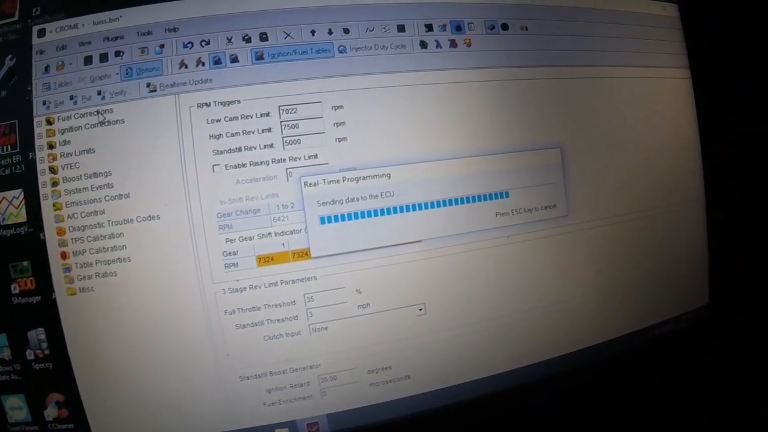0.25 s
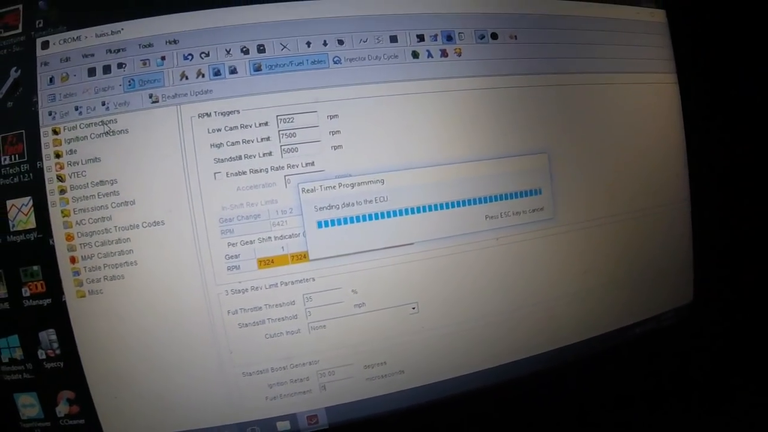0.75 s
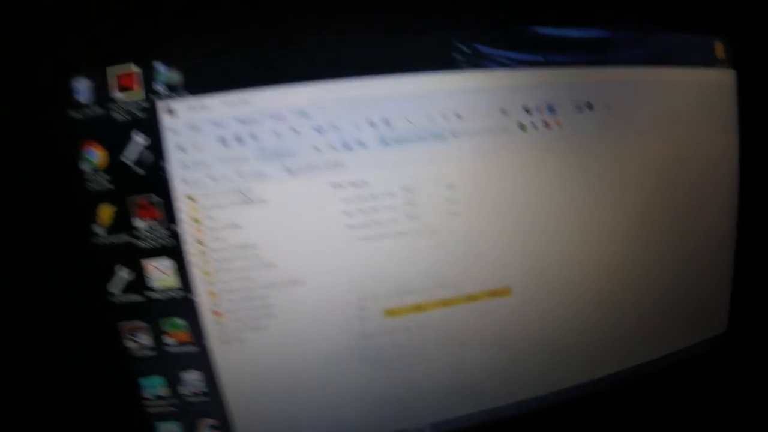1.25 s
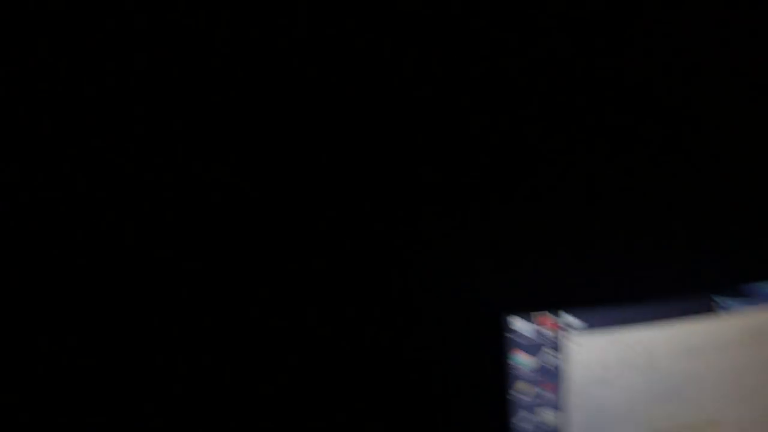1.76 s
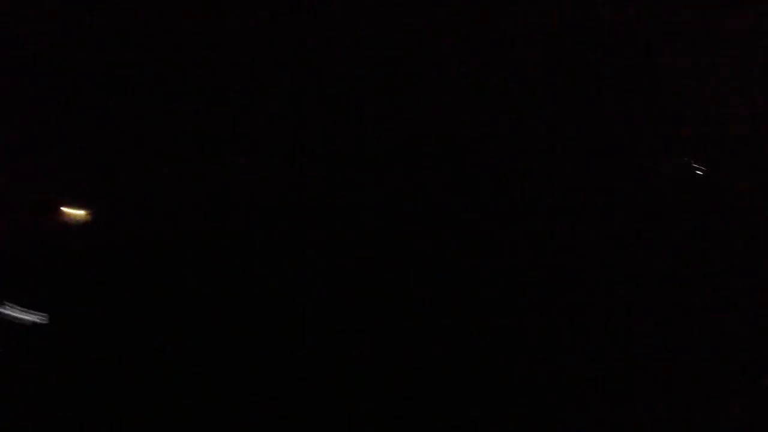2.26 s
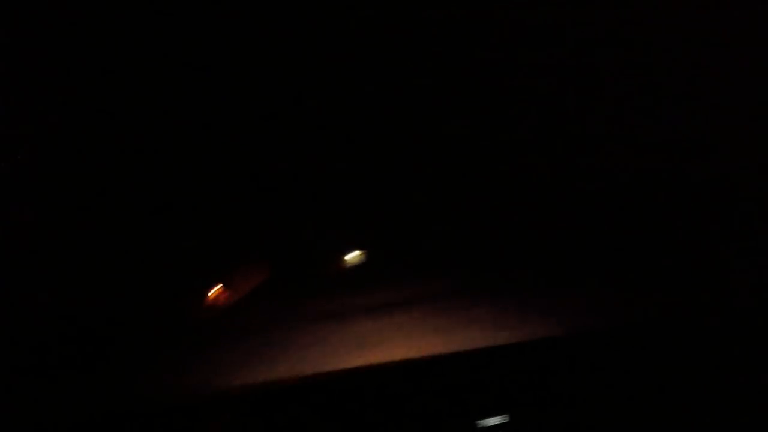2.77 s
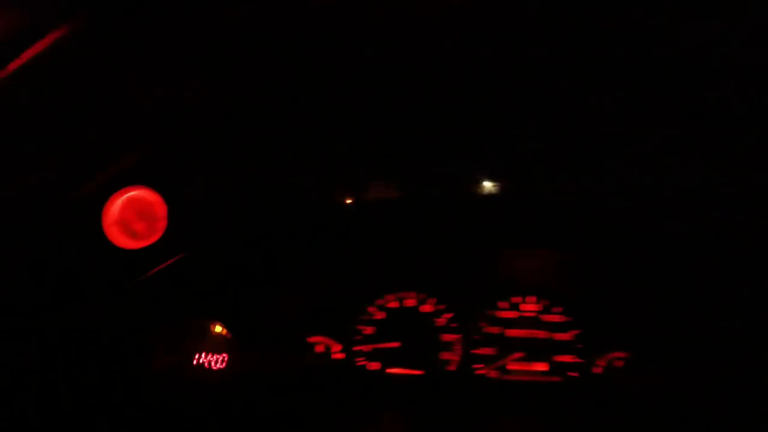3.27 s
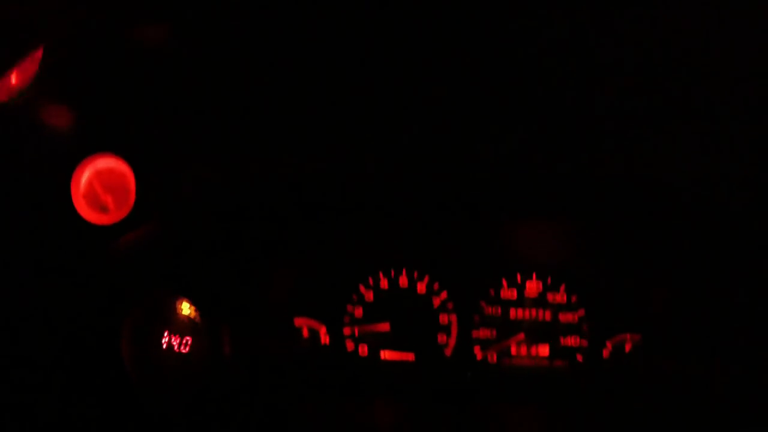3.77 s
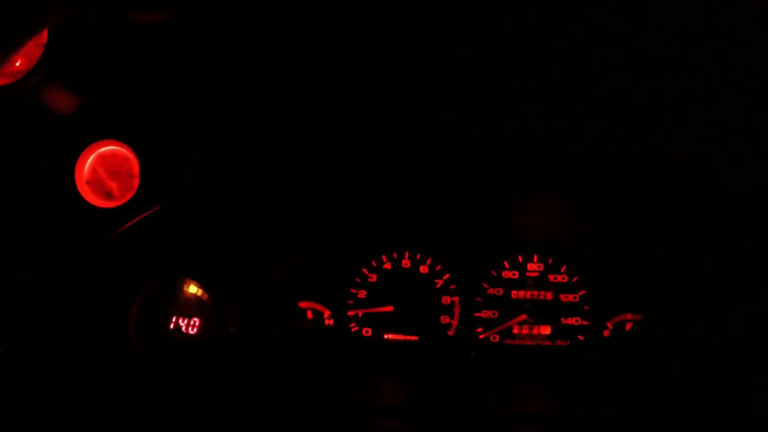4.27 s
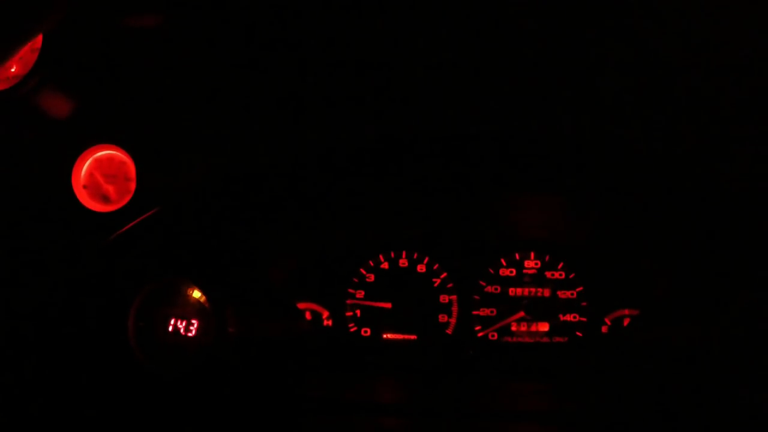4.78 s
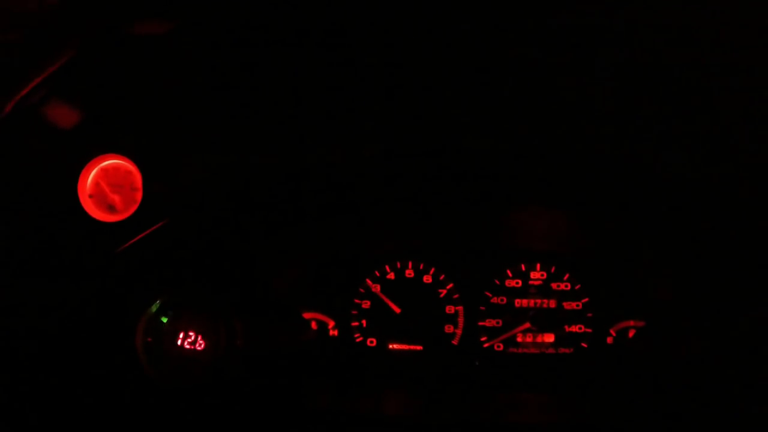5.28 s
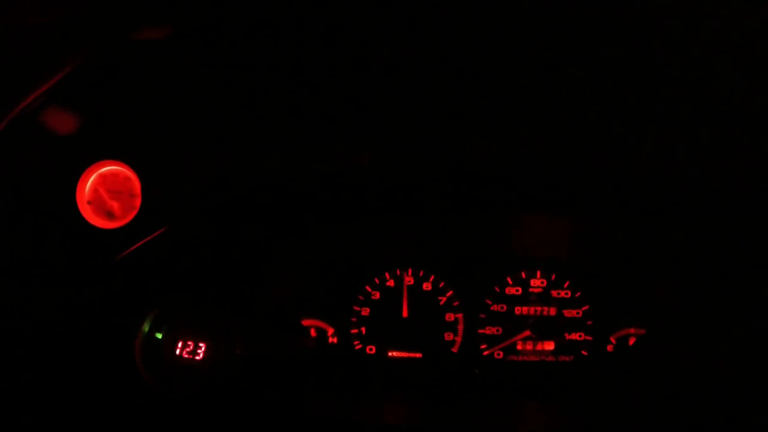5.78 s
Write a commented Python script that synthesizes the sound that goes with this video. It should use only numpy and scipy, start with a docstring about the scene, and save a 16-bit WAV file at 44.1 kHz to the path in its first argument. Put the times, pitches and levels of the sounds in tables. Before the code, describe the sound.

A low, pulsing engine idle fills the cabin of a stationary turbocharged car, its boom shifting as the microphone travels from a laptop to the dashboard. The plastic laptop knocks and scrapes briefly on the way. After a few seconds the throttle opens: the engine falters, fires hard and climbs in pitch with a faint rush of intake air, ending in choppy limiter cuts and dull exhaust pops.

```python
"""A low, throbbing idle fills a parked car: the exhaust pulses of a turbocharged four-cylinder boom in the
cabin over faint clatter and hiss. The microphone moves from a laptop toward the dashboard, and the laptop
is set down with a scrape. The throttle opens, the engine stumbles and catches, and its harmonics sweep
through the cabin's booms while the intake rushes and the alternator whines. At the top the rev limiter
cuts the firings, so the drone stutters and unburnt charge pops in the exhaust."""
import sys
import numpy as np
from scipy import signal
from scipy.fft import rfft, irfft
from scipy.io import wavfile
from scipy.ndimage import uniform_filter1d, minimum_filter1d, map_coordinates

SR = 44100
rng = np.random.default_rng(int(sys.argv[2]) if len(sys.argv) > 2 else 0)


def store_wav(level_fs):
    """Save 16-bit WAV to argv[1]."""
    pcm = np.round(np.clip(np.atleast_2d(level_fs), -1, 1) * 32767)
    wavfile.write(sys.argv[1], SR, pcm.T.astype(np.int16))


N = 266115
TIME = np.arange(N) / SR

# The microphone's path. Each row: time in seconds, place (0 laptop, 1 between the seats, 2 dashboard).
MIC_PATH = [(0, 0.048), (1, 0.13), (1.76, 0.25), (2.13, 1.09), (2.8, 1.66), (4.44, 1.755)]
# Handling rustles and laptop scrapes. Each row: middle in seconds, length in seconds, level in dB.
RUSTLES = [(2.66, 0.085, -56), (2.78, 0.033, -53.5)]
SCRAPES = [(2.163, 0.034, -33.5), (2.201, 0.027, -26), (2.219, 0.011, -34), (4.038, 0.018, -40)]
# One-shots. Each row: start in seconds, level in dB.
CABIN_CLICKS = [(2.122, -30), (4.458, -14), (5.61, -23.5)]
LAPTOP_KNOCKS = [(2.156, -19), (2.204, -15), (2.367, -23), (4.031, -26), (5.443, -22.5)]   # it lands, is nudged and is shaken
HARD_FIRINGS = [(4.5125, -9.5), (4.541, -5), (4.567, -6), (4.591, -8), (4.619, -11)]   # the engine fights out of its stumble
# Ringing parts. Each row: pitch in Hz, bandwidth in Hz, relative level in dB.
LAPTOP_MODES = [(284, 13, 6), (483, 29, 5), (673, 44, -1.5), (1000, 34, -2), (1315, 52, -8),
                (1767, 90, -15.5), (2040, 83, -16), (3290, 330, -22), (4620, 360, -27.5), (6780, 320, -31)]
PANEL_MODES = [(382.7, 13, -4), (492, 11, -2.5), (529, 12, 2), (628, 12, -5), (697, 9.2, -2)]

# Tone colours, drawn as EQ curves. Each row: frequency in Hz, relative level in dB.
RUSTLE_COLOUR = [(2000, -7), (3300, 2.5), (5000, -2), (7200, -3.5), (8200, -22)]
CLICK_COLOUR = [(200, 21.5), (1000, 6), (4000, -6), (12000, -23.5), (14000, -36)]
INTAKE_COLOUR = [(1200, 1.5), (2200, 1), (3900, -11), (5100, -5), (6000, -13.5)]
HISS_COLOUR = [(1500, -10), (2500, -1.5), (3200, -1.5), (5300, -5), (6500, -10.5), (8500, -14),
               (10500, -23.5), (14000, -25.5)]
CLATTER_AT_LAPTOP = [(200, -5), (320, 4), (630, 5.5), (760, -5.5), (1100, -8), (1900, -10), (2800, -17.5),
                     (4000, -32.5)]
CLATTER_AT_DASH = [(200, -6), (300, 8), (430, 0.5), (530, -2.5), (850, 0), (1080, -1.5), (1240, 0.5),
                   (1400, -7), (1700, -11), (2200, -10), (2800, -22), (4000, -35)]
IDLE_AT_LAPTOP = [(20, -49.5), (35, 4.5), (70, 0), (104, -4.5), (139, -7.5), (174, 2), (208, -15),
                  (243, -14), (280, -34.5), (315, -24), (380, -42), (630, -47), (900, -56.5)]
IDLE_AT_SEATS = [(20, -35.5), (35, 3.5), (70, -2), (104, -3.5), (139, -19.5), (174, -18), (208, -19.5),
                 (243, -16.5), (280, -35), (420, -44.5), (900, -45)]
IDLE_AT_DASH = [(20, -41), (35, 2), (70, -2), (104, 3.5), (139, -2), (174, 1.47), (208, -6.5), (243, -15),
                (280, -43), (385, -42), (530, -48), (900, -62)]
POP_COLOUR = [(90, 1), (340, 2.5), (450, -5), (590, 0), (800, -9.5), (3000, -42.5)]
RASP_COLOUR = [(60, -20), (260, -1), (355, 12), (440, -5), (520, 2), (640, -7.5), (850, -16), (1250, -25),
               (2500, -45)]   # the upper exhaust harmonics
CABIN_BOOMS = [(42, -11.5), (55, -10), (76, -17), (93, -17), (104, -11), (125, -12), (143, -15), (168, -9),
               (192, -21), (212, -17.5), (296, -39.5), (335, -23), (380, -27.5), (420, -45), (470, -44.5),
               (505, -27.5), (560, -42), (640, -36.5), (690, -47)]   # the resonances that the rev sweeps through
# The standing wave that lingers at laptop, seats and dashboard. Each entry: pitch in Hz.
STANDING_HZ = [54.3, 131, 79.6]
# The engine bay at idle. Each row: microphone place, clatter in dB, hiss in dB, both before their trims.
BAY_AT_PLACE = [(0, -50.3, -59), (.09, -48.5, -58.5), (.22, -46, -56.5), (1, -47, -57.5), (2, -45.5, -60)]

# The cylinders in firing order. Each row: strength in dB, lateness in firing periods.
CYLINDERS = [(0.04, 0.012), (1.73, -0.015), (-0.2, 0.0095), (1.4, -0.006)]
# The idle hunts, then the engine revs. Each row: time in seconds, firings per second.
IDLE_SPEED = [(0.0, 34.5), (1.01, 34.9), (2.09, 34.3), (2.6, 35.2), (4.44, 34.65)]
REV_SPEED = [(4.55, 39.1), (4.62, 43.8), (4.682, 51.5), (4.742, 56.9), (4.794, 61.5), (4.946, 71.9),
             (5.094, 95.6), (5.244, 103.8), (5.348, 101.3), (5.394, 111.4), (5.598, 160.4), (5.75, 165.1),
             (5.87, 167.3), (6.03, 164.8)]
# Engine load, with a brief lift of the pedal. Each row: time in seconds, gain on the drone in dB.
LOAD = [(4.7, -4.5), (4.85, -5), (5.02, 1), (5.18, -3), (5.32, -5.5), (5.43, 4), (5.54, 0), (5.7, 1.5),
        (5.86, -2.5), (5.97, -6)]
# The firing tone and its next four harmonics. Each entry: relative level in dB.
HARMONIC_DB = [-0.5, -3.5, -6.5, -13.5, -15.5]
# The rev limiter. Each row: start of the cut in seconds, return of the firings in seconds.
LIMITER_CUTS = [(5.749, 5.8), (5.869, 5.962)]
# Unburnt charge going off in the exhaust. Each row: start in seconds, thump in dB, crack in dB.
POPS = [(5.7743, -4.5, -20), (5.799, -13, -31), (5.8945, -9, -31), (5.905, -14, -20), (5.9222, -8.5, -28),
        (5.932, -15, -36), (5.9795, -8.5, -29), (5.9925, -8, -29)]

OPEN_S, OPEN_TAKES_S = 4.47, 0.03   # middle and length of the throttle's opening
CATCH_S, CATCH_TAKES_S = 4.63, 0.1   # middle and length of the crossfade from idle to drone


def from_db(db):
    """Decibels to gain."""
    return 10 ** (np.asarray(db) / 20)


def rms_one(x):
    """Scale to rms 1."""
    return x / np.sqrt(np.mean(x ** 2) + 1e-20)


def automation(rows):
    """A line through (seconds, value) points, at every sample."""
    return np.interp(TIME, *np.transpose(rows))


def ramp(middle_s, length_s):
    """An even fade from 0 to 1."""
    return np.clip((TIME - middle_s) / length_s + .5, 0, 1)


def bump(middle_s, length_s):
    """A smooth swell to 1 and back; the length is taken at half height."""
    return .5 + .5 * np.cos(np.pi * np.clip((TIME - middle_s) / length_s, -1, 1))


def strokes(rows):
    """The envelope of rubbing: one swell a stroke."""
    return sum(from_db(db) * bump(middle_s, length_s) for middle_s, length_s, db in rows)


def drift(rate_hz):
    """A smooth random wobble with rms 1."""
    knots = rng.standard_normal(int(rate_hz * N / SR) + 4)
    return rms_one(map_coordinates(knots, [TIME * rate_hz + 1], order=2))


def impulses(times, sizes):
    """One click at each time."""
    return np.bincount(np.clip(np.round(times * SR).astype(int), 0, N - 1), sizes, N)


def strikes(rows):
    """Clicks from rows of seconds and dB."""
    times, db = np.transpose(rows)
    return impulses(times, from_db(db))


def through(x, colour, size=16384):
    """Sound rings a body of this colour, which falls 24 dB an octave beyond its ends."""
    hz, db = np.transpose(colour)
    grid_hz = np.maximum(np.arange(size // 2 + 1) * SR / size, 1)
    octaves_outside = np.maximum(np.log2(hz[0] / grid_hz), 0) + np.maximum(np.log2(grid_hz / hz[-1]), 0)
    level_db = np.interp(np.log(grid_hz), np.log(hz), db) - 24 * octaves_outside
    cepstrum = irfft(np.log(from_db(np.maximum(level_db, -110))))
    cepstrum[size // 2:] = 0   # minimum phase: the ring follows the hit
    ring = irfft(np.exp(2 * rfft(cepstrum)))[:size // 2]
    return signal.fftconvolve(x, ring / np.abs(ring).max())[:len(x)]


def poles(hz, width_hz):
    """The feedback coefficients of one damped resonance."""
    radius = np.exp(-np.pi * width_hz / SR)
    return [1, -2 * radius * np.cos(2 * np.pi * hz / SR), radius * radius]


def resonate(x, modes):
    """Sound rings a bank of modes of alternating polarity."""
    out = 0
    for k, (hz, width_hz, db) in enumerate(modes):
        feedback = poles(hz, width_hz)
        band = np.array([1, 0, -1]) * (1 - feedback[2]) / 2
        out = out + (-1) ** k * from_db(db) * signal.lfilter(band, feedback, x)
    return out


def standing_wave(x, hz, width_hz=11):
    """A standing wave in the cabin holds its own pitch back a little."""
    feedback = poles(hz, width_hz)
    return signal.lfilter(feedback[::-1], feedback, x)


def thump(x, low_hz, high_hz):
    """Each click becomes one dull swing of the cabin air, as tall as the click."""
    sos = np.vstack([signal.butter(3, [low_hz, high_hz], "band", fs=SR, output="sos"),
                     signal.butter(6, 1.2 * high_hz, fs=SR, output="sos")])
    return signal.sosfilt(sos, x + 1e-18) / np.abs(signal.sosfilt(sos, signal.unit_impulse(SR))).max()


def octaves(speed):
    """Engine speed in octaves from its top."""
    return np.log2(speed / speed.max())


def firings(cycle, uneven_db, jitter):
    """One pulse a firing; each cylinder has its own strength and timing, and no two burns are alike."""
    number = np.arange(1, int(cycle[-1]))
    db, late = np.array(CYLINDERS)[number % len(CYLINDERS)].T
    chance = rng.standard_normal((len(number), 2))
    times = np.interp(number + late + jitter * chance[:, 0], cycle, TIME)
    return impulses(times, from_db(db + uneven_db * chance[:, 1]))


def idle_fade(stumble_s=4.46, db_per_s=300, depth_db=11):
    """The idle ducks as the engine stumbles and fades out as it catches."""
    duck_db = np.clip(db_per_s * (TIME - stumble_s), 0, depth_db)
    return from_db(-duck_db) * (1 - ramp(CATCH_S, CATCH_TAKES_S))


def handling():
    """Soft, bright rustles as the microphone is carried forward."""
    return strokes(RUSTLES) * rms_one(through(rng.standard_normal(N), RUSTLE_COLOUR))


def alternator(cycle, speed, order=23.17, top_db=-62, octave_db=-58):
    """A thin whine that grows steeply with speed; its octave swells near the dashboard at idle."""
    phase = 2 * np.pi * order * cycle
    whine = from_db(top_db) * (speed / speed.max()) ** 4 * np.sin(phase)
    octave = from_db(octave_db) * bump(middle_s=3.45, length_s=1.0) * np.sin(2 * phase)
    return (whine + octave) * from_db(1.2 * drift(25))


def intake_rush(level_db=-56, flutter=0.26):
    """Air rushes through the intake as the turbo starts to spool, then eases abruptly."""
    flow = bump(middle_s=5.33, length_s=0.28) * (1 - ramp(middle_s=5.42, length_s=0.03))
    air = rng.standard_normal(N) * (1 + flutter * drift(100))
    return from_db(level_db) * flow * rms_one(through(air, INTAKE_COLOUR))


def trim_panels(cycle, level_db=-57, db_per_place=3.5):
    """The idle shakes the trim panels, which ring faintly and unsteadily, most near the dashboard."""
    shake = rms_one(firings(cycle, uneven_db=1.5, jitter=0.012)) + rng.standard_normal(N)
    ring = rms_one(resonate(shake * idle_fade(), PANEL_MODES))
    return from_db(level_db + db_per_place * automation(MIC_PATH)) * ring


def cabin_clicks():
    """A few sharp clicks with a dark body."""
    return through(strikes(CABIN_CLICKS), CLICK_COLOUR)


def laptop(slips_per_s=3000, slip_spread_db=4, knock_cutoff_hz=1900):
    """Dense little slips and a few dull knocks ring the laptop's plastic shell."""
    slips = (rng.random(N) < slips_per_s / SR) * rng.choice([-1, 1], N)
    slips = slips * from_db(-slip_spread_db * drift(180))
    scrape = resonate(slips * strokes(SCRAPES), LAPTOP_MODES) / np.std(resonate(slips, LAPTOP_MODES))
    hits = strikes(LAPTOP_KNOCKS)
    soft_hits = signal.lfilter(*signal.butter(1, knock_cutoff_hz, fs=SR), hits + 1e-18)
    knocks = resonate(soft_hits, LAPTOP_MODES)
    return scrape + knocks / np.abs(knocks).max() * hits.max()


def block_knock(cycle, ring_s=0.046, own_db=-3, jitter_s=0.00004, size=2048):
    """Each firing shakes the block with the same short ring, a little different for each cylinder."""
    knocks, common = 0, rng.standard_normal(size)
    decay = np.exp(-np.arange(size) / (ring_s * SR))
    for k in range(len(CYLINDERS)):
        times = np.interp(np.arange(k + 1, cycle[-1], len(CYLINDERS)), cycle, TIME)
        ring = (common + from_db(own_db) * rng.standard_normal(size)) * decay
        blows = impulses(times + jitter_s * rng.standard_normal(len(times)), np.ones(len(times)))
        knocks = knocks + signal.fftconvolve(blows, ring)[:N]
    return rms_one(knocks / np.sqrt(np.gradient(cycle)))   # the level holds as the blows crowd together


def bay_levels(speed, place, top_clatter_db=-43, top_hiss_db=-58.5, db_per_octave=7.5, floor_db=-13):
    """Faders for clatter and hiss in dB: they ride the microphone's place at idle, then engine speed."""
    places, clatter_db, hiss_db = np.transpose(BAY_AT_PLACE)
    opened = ramp(OPEN_S, OPEN_TAKES_S)
    gulp_db = 8 * bump(middle_s=4.6, length_s=0.096)   # the intake gulps air as the engine catches
    growth_db = np.maximum(db_per_octave * octaves(speed), floor_db) + gulp_db
    return [(1 - opened) * np.interp(place, places, idle_db) + opened * (top_db + growth_db)
            for idle_db, top_db in [(clatter_db, top_clatter_db), (hiss_db, top_hiss_db)]]


def engine_bay(cycle, speed, clatter_trim_db=1.5, hiss_trim_db=0.43, throb=0.2, flicker_db=2, tick_db=-8):
    """Block knock, loose clatter above it and hiss swell with every firing; the valves tick in between."""
    place = automation(MIC_PATH)
    forward = np.clip(place / 2, 0, 1)   # 0 at the laptop, 1 at the dashboard
    swell = 1 + throb * np.cos(2 * np.pi * (cycle + 0.17))
    loose = signal.lfilter(*signal.butter(1, 1000, "high", fs=SR), rng.standard_normal(N))
    shake = block_knock(cycle) + from_db(flicker_db * drift(82)) * swell * loose
    at_laptop = from_db(2.5) * rms_one(through(shake, CLATTER_AT_LAPTOP))
    at_dash = rms_one(through(shake, CLATTER_AT_DASH))
    clatter = (1 - forward) * at_laptop + forward * at_dash
    valves = np.exp(-15 * ((2 * cycle + 0.49) % 1)) * from_db(2 * drift(67))   # two ticks a firing
    hiss_envelope = swell + forward * from_db(tick_db) * rms_one(valves)
    hiss = rms_one(through(rng.standard_normal(N) * hiss_envelope, HISS_COLOUR))
    clatter_db, hiss_db = bay_levels(speed, place)
    return from_db(clatter_db + clatter_trim_db) * clatter + from_db(hiss_db + hiss_trim_db) * hiss


def idle(cycle, level_db=-15.5, db_per_place=1.31):
    """Slow exhaust pulses boom in the cabin, whose standing waves differ from place to place."""
    place = automation(MIC_PATH)
    pulses = firings(cycle, uneven_db=0.95, jitter=0.0092)
    preroll = np.searchsorted(cycle, cycle[0] + 2 * len(CYLINDERS))
    pulses = np.r_[pulses[:preroll], pulses]   # the engine is already running
    boom = 0
    for k, (colour, hz) in enumerate(zip([IDLE_AT_LAPTOP, IDLE_AT_SEATS, IDLE_AT_DASH], STANDING_HZ)):
        heard = standing_wave(through(pulses, colour), hz)[preroll:]
        nearness = np.maximum(1 - np.abs(place - k), 0)
        boom = boom + nearness * heard / np.std(heard[:N // 2])
    boom = standing_wave(boom, hz=221.8, width_hz=35.7)   # smears the top of each firing everywhere
    return -from_db(level_db + db_per_place * place) * idle_fade() * boom


def stumble():
    """A few hard, separate firings get the engine going again."""
    return thump(strikes(HARD_FIRINGS), low_hz=42, high_hz=178)


def exhaust_pops(gas_db=-24, gas_s=0.014, cut_db=-12.5):
    """Unburnt charge pops with a thump, a crack and a puff of gas; each cut opens with a deeper thump."""
    times, thump_db, crack_db = np.transpose(POPS)
    thumps = thump(impulses(times, from_db(thump_db)), low_hz=70.4, high_hz=236)
    cracks = impulses(times, from_db(crack_db))
    tails = signal.lfilter([1], [1, -np.exp(-1 / (gas_s * SR))], cracks + 1e-18)
    gas = from_db(gas_db) * tails * rng.standard_normal(N)
    cut_thumps = thump(strikes([(start, cut_db) for start, end in LIMITER_CUTS]), low_hz=40, high_hz=130)
    return thumps + cut_thumps + through(cracks + gas, POP_COLOUR)


def rev_limiter(cut_db=-15, ramp_s=0.006):
    """A gate: wide open while the cylinders fire, nearly shut while the limiter cuts them."""
    cutting = sum((TIME > start) & (TIME < end) for start, end in LIMITER_CUTS)
    return uniform_filter1d(from_db(cut_db * cutting), int(ramp_s * SR))


def exhaust_rasp(cycle, speed, puff_db=-1, dull_hz=400, bright_firings_per_s=150):
    """Rough pulses, each with a puff of turbulent gas; faster ones have steeper, brighter fronts."""
    pulses = rms_one(firings(cycle, uneven_db=3.5, jitter=0.0067))
    puffs = rng.standard_normal(N) * (1 + np.cos(2 * np.pi * cycle))
    bright = through(pulses + from_db(puff_db) * puffs, RASP_COLOUR)
    dull = signal.sosfiltfilt(signal.butter(4, dull_hz, fs=SR, output="sos"), bright)
    rasp = dull + np.minimum(speed / bright_firings_per_s, 1) ** 2 * (bright - dull)
    return rasp / np.sqrt(uniform_filter1d(rasp ** 2, size=4096) + 1e-9)   # held at an even level


def exhaust_drone(cycle, speed, growl_db=-22, waver_db=1.6, lope=0.051):
    """Pulses merge to harmonics that sweep the cabin's booms, with a growl between the lowest two."""
    drone = 0
    boom_hz, boom_db = np.transpose(CABIN_BOOMS)
    for order, db in [*enumerate(HARMONIC_DB, 1), (1.5, growl_db)]:
        hz = order * speed
        level_db = db + np.interp(np.log(hz), np.log(boom_hz), boom_db) + waver_db * drift(40)
        # a tone falls half a cycle behind as it climbs past 168 Hz, and again past 300 Hz
        lag = sum(np.arctan2(20, lag_hz - hz) for lag_hz in (168, 300))
        drone = drone - np.sqrt(2) * from_db(level_db) * np.cos(2 * np.pi * order * cycle - lag)
    drone *= from_db(automation(LOAD)) * np.sqrt(ramp(CATCH_S, CATCH_TAKES_S))
    return drone * (1 + lope * (np.sin(np.pi * cycle) + np.sin(np.pi * cycle / 2)))   # unequal cylinders


def exhaust(cycle, speed, flow_db=-33, db_per_octave=9.5, relight_db=7, rumble_db=1):
    """The rev: drone and rasp, chopped by the limiter, over an unbroken rumble of gas."""
    drone = exhaust_drone(cycle, speed)
    relit = TIME > LIMITER_CUTS[0][1]   # the rasp bites harder after the first cut
    rasp = exhaust_rasp(cycle, speed) * from_db(relight_db * relit)
    rumble = rms_one(through(rng.standard_normal(N), colour=[(25, -4.5), (110, -7.5), (200, -2)]))
    flow = from_db(flow_db + db_per_octave * octaves(speed)) * ramp(OPEN_S, OPEN_TAKES_S)
    return (drone + flow * rasp) * rev_limiter() + flow * from_db(rumble_db) * rumble


def scene():
    """The mono mix: the engine's layers share one count of firings, with small cabin noises on top."""
    speed = automation([*IDLE_SPEED, *REV_SPEED])   # firings per second
    cycle = np.cumsum(speed) / SR + 0.83   # firings so far, starting partway through one
    engine = idle(cycle) + stumble() + exhaust(cycle, speed) + exhaust_pops()
    machinery = engine_bay(cycle, speed) + alternator(cycle, speed) + intake_rush()
    cabin = trim_panels(cycle) + laptop() + handling() + cabin_clicks()
    return (engine + machinery + cabin)[None]


def peak_limiter(x, ceiling=0.56, size=700):
    """A look-ahead limiter eases the gain down around the tallest peaks."""
    gain = minimum_filter1d(np.minimum(1, ceiling / (np.abs(x) + 1e-9)), 2 * size)
    return x * uniform_filter1d(uniform_filter1d(gain, size), size)


def record(dry, port_hz=6500, dip_hz=6150, cutoff_hz=15400, fade_s=0.004):
    """The microphone's port rings in the treble, just above a dip; peaks are limited, the top is cut."""
    from_edge_s = np.minimum(TIME, TIME[-1] - TIME)
    x = dry * np.sin(np.pi / 2 * np.minimum(1, from_edge_s / fade_s)) ** 2
    x = x + 1.8 * signal.lfilter(*signal.iirpeak(port_hz, Q=14, fs=SR), x)
    x = x - 0.41 * signal.lfilter(*signal.iirpeak(dip_hz, Q=12, fs=SR), x)
    return signal.sosfilt(signal.cheby2(12, 70, cutoff_hz, fs=SR, output="sos"), peak_limiter(x))


dry = scene()
out = record(dry)
store_wav(out)
```